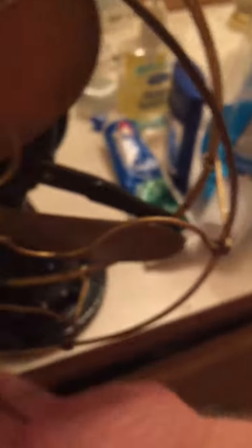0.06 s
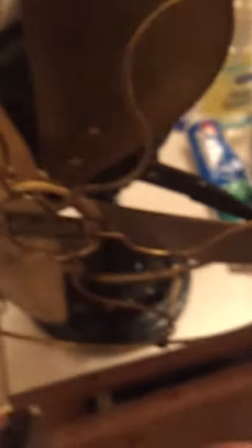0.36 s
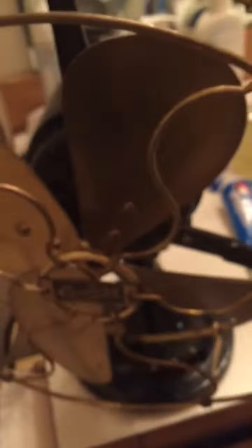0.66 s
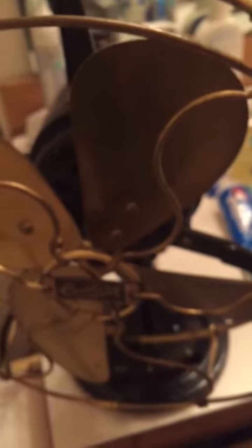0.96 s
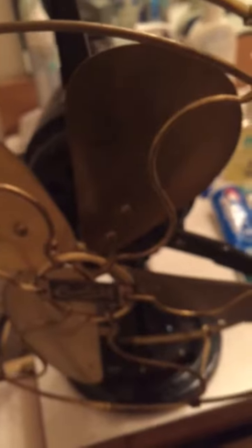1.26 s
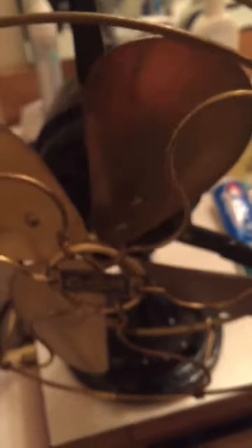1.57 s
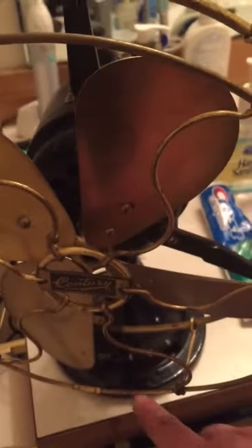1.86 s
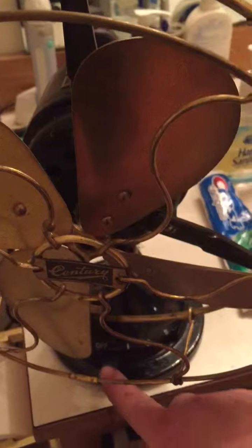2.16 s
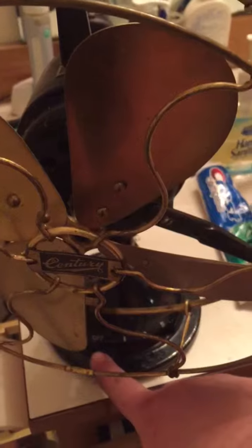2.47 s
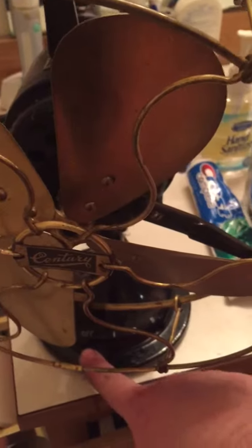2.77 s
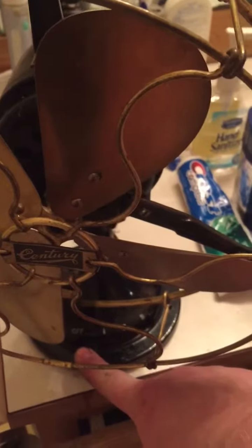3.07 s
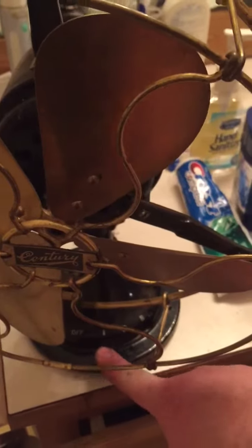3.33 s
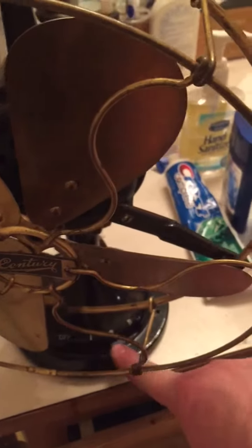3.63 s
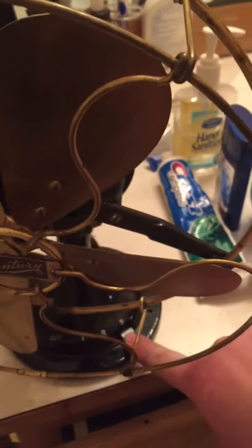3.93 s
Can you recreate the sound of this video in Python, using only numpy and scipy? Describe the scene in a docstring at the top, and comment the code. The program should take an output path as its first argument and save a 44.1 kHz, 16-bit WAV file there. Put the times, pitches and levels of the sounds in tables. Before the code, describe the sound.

An old metal fan's speed lever scrapes and snaps into a notch over low hum.

```python
"""The speed lever of an old metal desk fan scrapes over its contacts and snaps into a notch,
ringing the metal base and a small, hard-walled room. A steady mains hum lies under it all.
Leading in, fingers shift on the camera with close rubs, clicks and soft bumps,
and a few faint squeaks come before the lever slides."""
import sys
import numpy as np
from scipy import signal
from scipy.fft import rfft, irfft, next_fast_len
from scipy.io import wavfile
from scipy.ndimage import map_coordinates

SR = 44100
rng = np.random.default_rng(int(sys.argv[2]) if len(sys.argv) > 2 else 0)


def pcm_store(signal):
    """Save signal as 16-bit PCM."""
    levels = np.round(np.clip(np.atleast_2d(signal), -1, 1) * 32767)
    wavfile.write(sys.argv[1], SR, levels.astype(np.int16).T)


N = 176400

# Level ride of the hum's main tone: t/s, level/dB
HUM_RIDE = [(0.58, -51), (0.6, -58), (0.82, -56.5), (0.86, -54), (1.06, -52.5), (1.1, -60.5), (1.16, -52.5)]
# Weaker tones in the hum: f/Hz, level/dB, unsteadiness/0-1
HUM_TONES = [(179.3, -70.3, .5), (240, -78.8, .35), (806.9, -73.9, .3)]
# Colour of the room air: f/Hz, gain/dB
AIR_EQ = [(25, -17.5), (45, -9.5), (80, -2), (150, 3.5), (280, -9.5), (500, -17.5), (1000, -21.5),
          (2500, -24.5), (6500, -29.5), (10400, -33.5), (15500, -35.5)]
# Skin rubs on the camera; last, the lever's bright scraping hiss around the snap:
# peak t/s, rise/s, fall/s, hiss level/dB, body level/dB, body f/Hz
RUB_CUES = [(0.374, 0.022, 0.053, -92, -68.5, 2950), (.6, 0.043, 0.014, -72.5, -67, 1500),
            (.652, 0.03, 0.015, -66, -67.5, 1190), (0.735, 0.039, 0.033, -69.5, -67, 700),
            (1.385, 0.037, 0.057, -71, -77, 1800), (1.48, 0.026, 0.028, -76.5, -85, 1800),
            (3.935, 0.036, .04, -60.5, -75, 2500)]
# Colour of the friction hiss: f/Hz, gain/dB
HISS_EQ = [(500, -17), (3000, -6), (6500, 9), (10400, 8), (12500, 7.5), (15500, 1.5)]
# Finger hits on the camera: t/s, thump level/dB, knock level/dB, knock cutoff f/Hz, tick level/dB
FINGER_HITS = [(0.5666, -69, -26.5, 2500, -31), (0.5717, -34, -35.5, 2000, -19.5),
               (0.579, -77, -31.5, 2400, -28), (0.5821, -44.5, -44, 3000, -21.5),
               (0.734, -66, -42.5, 1700, -62), (0.971, -51, -35, 504, -85), (1.077, -68, -51, 1310, -85),
               (1.170, -45.5, -60, 500, -90), (1.352, -43, -45, 2600, -63.5)]
# Low and midrange modes of the camera body: f/Hz, gain/dB, t60/s
THUMP_MODES = [(88.4, -2.5, 0.11), (204, 3, 0.009)]
KNOCK_MODES = [(343, -9, 0.017), (513, -9, 0.0097), (715, -9.5, 0.016), (1280, -1, 0.0046),
               (1680, -8.5, 0.013), (1860, -9, 0.0086), (2530, -7, 0.0049)]
# Colour of a finger tick: f/Hz, gain/dB
TICK_EQ = [(300, -4), (2600, -9), (4000, 1), (5500, 4), (7300, 6), (10600, -4.5), (13000, -1), (15500, -8)]
# Swells of the shifting grip: peak t/s, half width/s, level/dB
GRIP_SWELLS = [(.595, 0.025, -65), (1.37, 0.027, -61), (3.69, 0.05, -67)]
# Colour of the grip rumble: f/Hz, gain/dB
GRIP_EQ = [(20, -13), (75, 1), (130, -28), (1000, -64)]
# Faint squeaks: peak t/s, half width/s, f/Hz, level/dB
SQUEAK_CUES = [(.695, .025, 2170, -79), (1.187, .028, 2385, -76.5), (1.285, .03, 2400, -80.5),
               (1.395, .03, 2280, -80), (2.457, .014, 1550, -58.5), (2.472, .046, 1590, -64),
               (2.493, 0.015, 1580, -60), (3.795, .012, 4690, -72)]
# Friction under the sliding lever: t/s, level/dB
SCRAPE_RIDE = [(3.2, -100), (3.32, -75), (3.405, -76.5), (3.425, -68), (3.54, -60), (3.6, -62), (3.68, -77),
               (3.715, -60.5), (3.723, -57.5), (3.746, -71.5), (3.795, -66.5), (3.82, -74.5), (3.88, -75),
               (3.91, -58.5)]
# Resonances of the scrape: f/Hz, width/Hz, gain/dB
SCRAPE_BANDS = [(610, 480, -2.5), (1460, 126, 5.5), (1695, 170, 3), (2795, 190, 1.5), (3456, 49, 9),
                (4710, 940, -10.5), (5950, 640, -10), (8300, 1300, -17), (11650, 1100, -16.5),
                (14600, 970, -21)]
# Lever hits in the notch: t/s, level/dB, attack/s
LEVER_HITS = [(3.9306, -15, 0.00097), (3.9395, -46, 0.00072), (3.9471, -35, .002)]
# Colour of the snap's crack: f/Hz, gain/dB
CRACK_EQ = [(300, -13), (1300, 6), (4200, 6.5), (8500, -3), (10500, 0), (13500, -3), (15500, -19)]
# Short modes of lever and base: f/Hz, gain/dB, t60/s
BASE_MODES = [(1200, -11, 0.0063), (1533, -2.5, 0.012), (1830, -5.5, 0.01), (2573, -2.5, 0.01),
              (2760, -9.5, 0.016), (3180, -3.5, 0.014), (3490, -2, 0.011), (4340, -11.5, 0.009),
              (5230, -6.5, 0.0064), (6400, 4.5, 0.0078), (8320, -15.5, 0.013), (9930, -1, 0.0053)]
# A low room resonance, then the lingering modes of the metal housing: f/Hz, gain/dB, t60/s
LINGERING_MODES = [(458, -26, 0.13), (682, -33, 0.18), (1230, -34, 0.18), (1815, -30, 0.15),
                   (2340, -32, .15), (2635, -30, 0.14), (2765, -21, 0.13), (3205, -27, .14),
                   (3305, -26.5, 0.14), (4484, -27, .11), (5140, -26, .11), (6385, -25, .16)]
# Decay of the room: f/Hz, t60/s
ROOM_DECAY = [(300, 0.28), (2000, 0.19), (6500, 0.22), (14000, 0.14)]
# Colour of the reverb: f/Hz, gain/dB
ROOM_EQ = [(400, 1), (1100, 12), (1700, -4), (2200, 9), (2700, 0), (3500, 1), (4100, 1.5), (5200, 9),
           (6400, -1), (7200, 1), (9000, -3), (14000, -1)]


def amp(db):
    """Decibels to gain."""
    return 10 ** (np.asarray(db) / 20)


def unit(x):
    """Scale to rms 1."""
    return x / np.sqrt(np.mean(x ** 2) + 1e-20)


def clock():
    """Time of every sample."""
    return np.arange(N) / SR


def along(points, hz):
    """Read (f, value) points on a log frequency axis."""
    f, v = np.transpose(points)
    return np.interp(np.log(hz + 1), np.log(f + 1), v)


def wobble(rate):
    """A smooth random modulator, rate knots a second."""
    return map_coordinates(rng.standard_normal(N // 8), [clock() * rate], mode="wrap")


def bell_fade(peak_s, width_s):
    """A bell-shaped fade in and out."""
    return np.exp(-((clock() - peak_s) / width_s) ** 2)


def rise_over(t, rise_s):
    """An exponential fade-in."""
    return 1 - np.exp(-t / rise_s)


def filtered(x, response):
    """Shape x with a frequency response."""
    size = next_fast_len(N + SR // 2)
    return irfft(rfft(x, size) * response(np.fft.rfftfreq(size, 1 / SR)), size)[:N]


def lowpass(x, hz):
    """Roll off the treble, as a softer contact does."""
    return signal.sosfilt(signal.butter(2, min(hz, SR * .45), fs=SR, output="sos"), x)


def peak_curve(f, centre, width):
    """Response of one resonance."""
    return f * width / (centre ** 2 - f * f + 1j * f * width)


def noise(eq):
    """Coloured noise of rms 1."""
    return unit(filtered(rng.standard_normal(N), lambda hz: amp(along(eq, hz))))


def ring(modes, t, wave=np.sin):
    """Damped modes after a hit, alternating in polarity."""
    return sum((-1) ** k * amp(db - 60 * t / t60) * wave(2 * np.pi * hz * t)
               for k, (hz, db, t60) in enumerate(modes))


def add(track, s, sound):
    """Mix a sound in at time s."""
    part = track[round(s * SR):][:len(sound)]
    part += sound[:len(part)]


def room(x, predelay_s=0.0027):
    """Hard walls return a short, coloured tail whose top end dies first."""
    hz, t, spectrum = signal.stft(rng.standard_normal(SR // 2), SR, nperseg=256)
    decay = amp(-60 * t / along(ROOM_DECAY, hz)[:, None])
    tail = signal.istft(spectrum * decay, SR, nperseg=256)[1]
    tail = np.pad(tail / np.linalg.norm(tail), (round(predelay_s * SR), 0))
    send = filtered(x, lambda f: amp(along(ROOM_EQ, f)))
    return signal.fftconvolve(send, tail)[:N]


def hum(hum_hz=120, waver_db=.5, air_db=-66):
    """The bed: mains hum and weaker wavering tones over room air."""
    t = clock()
    ride_db = np.interp(t, *np.transpose(HUM_RIDE)) + waver_db * wobble(4.67)
    tones = amp(ride_db) * np.sin(2 * np.pi * hum_hz * t)
    for hz, db, unsteady in HUM_TONES:
        drift = 1 + unsteady * (wobble(6.2) + 1j * wobble(21)) / 2  # in level and phase
        tones += amp(db) * np.real(drift * np.exp(2j * np.pi * hz * t))
    return np.sqrt(2) * tones + amp(air_db) * noise(AIR_EQ)


def rubs(grain_db=2):
    """Grainy swells of friction from skin and, last, the lever: hiss over a broad body."""
    t, out = clock(), np.zeros(N)
    hiss = noise(HISS_EQ)
    for s, rise, fall, hiss_db, body_db, body_hz in RUB_CUES:
        body = unit(filtered(rng.standard_normal(N), lambda f: peak_curve(f, body_hz, body_hz)))
        swell = bell_fade(s, np.where(t < s, rise, fall))
        out += swell * (amp(hiss_db) * hiss + amp(body_db) * body)
    return out * amp(grain_db * wobble(300))


def touches(tick_t60=.0028, room_db=-25):
    """Fingers thump, knock and tick on the camera body, duller when they land softly."""
    out, t = np.zeros(N), np.arange(SR // 4) / SR
    tick_envelope = rise_over(t, .0003) * amp(-60 * t / tick_t60)
    knock = rise_over(t, .00039) * ring(KNOCK_MODES, t, np.cos)
    thump = ring(THUMP_MODES, t)
    for s, thump_db, knock_db, cutoff_hz, tick_db in FINGER_HITS:
        tick = amp(tick_db) * tick_envelope * noise(TICK_EQ)[:len(t)]
        add(out, s, amp(knock_db) * lowpass(knock, cutoff_hz) + tick - amp(thump_db) * thump)
    return out + amp(room_db) * room(out)


def grip():
    """Soft swells of rumble as the grip on the camera shifts."""
    return noise(GRIP_EQ) * sum(amp(db) * bell_fade(s, width) for s, width, db in GRIP_SWELLS)


def squeaks(jitter_hz=32, roughness=.35):
    """Faint chirps, roughened by a flutter in pitch and level."""
    out = np.zeros(N)
    jitter = jitter_hz * wobble(250)
    for s, width, hz, db in SQUEAK_CUES:
        phase = 2 * np.pi * np.cumsum(hz + jitter) / SR
        out += amp(db) * bell_fade(s, width) * np.sin(phase)
    return out * (1 + roughness * wobble(300))


def lever_scrape(grain_db=1, judder_db=2.2):
    """The lever judders over its contacts, and the gritty friction sounds through the base."""
    friction = rng.standard_normal(N) * amp(grain_db * wobble(1100) + judder_db * wobble(110))
    scrape = filtered(friction, lambda f: sum((-1) ** k * amp(db) * 1j * peak_curve(f, hz, width)
                                              for k, (hz, width, db) in enumerate(SCRAPE_BANDS)))
    ride_db = np.interp(clock(), *np.transpose(SCRAPE_RIDE), left=-120)
    return unit(scrape) * amp(ride_db)


def lever_snap(catch_s=3.904, catch_db=-28.5, catch_hz=1760, crack_db=2, crack_t60=.0053, room_db=-9):
    """The lever catches softly, then cracks into its notch and rattles, ringing metal and room."""
    out, t = np.zeros(N), np.arange(SR // 3) / SR
    base = ring(BASE_MODES, t)
    catch = lowpass(lowpass(base * rise_over(t, .0029), catch_hz), catch_hz)
    add(out, catch_s, amp(catch_db) * catch)
    for s, db, rise_s in LEVER_HITS:
        crack = amp(crack_db - 60 * t / crack_t60) * noise(CRACK_EQ)[:len(t)]
        add(out, s, amp(db) * rise_over(t, rise_s) * (base + crack))
    out += amp(room_db) * room(out)
    # A low room resonance swells after the hardest hit, along with the housing's lingering ring.
    s, db, _ = max(LEVER_HITS, key=lambda row: row[1])
    add(out, s, amp(db) * rise_over(t, .018) * ring(LINGERING_MODES, t))
    return out


def scene():
    """Bed, handling and lever in one mono mix."""
    return (hum() + touches() + rubs() + grip() + squeaks() + lever_scrape() + lever_snap())[None]


def record(dry, low_cut_hz=31, top_hz=15850):
    """The camera thins the sub-bass and cuts everything above its band limit."""
    low_cut = signal.butter(2, low_cut_hz, "highpass", fs=SR, output="sos")
    return filtered(signal.sosfilt(low_cut, dry[0]), lambda hz: hz < top_hz)[None]


dry = scene()
out = record(dry)
pcm_store(out)
```